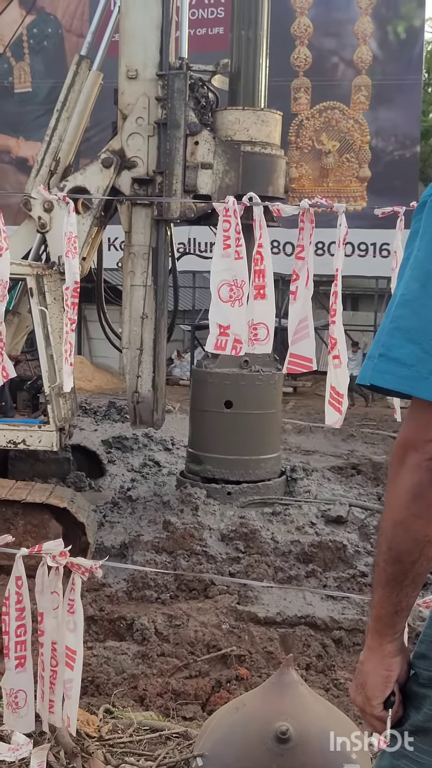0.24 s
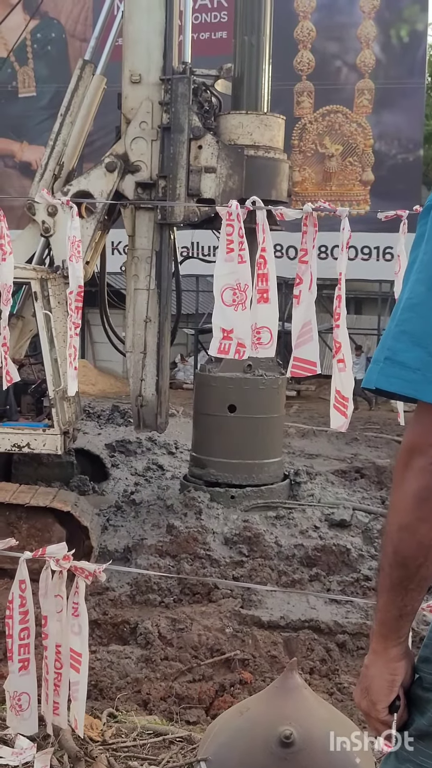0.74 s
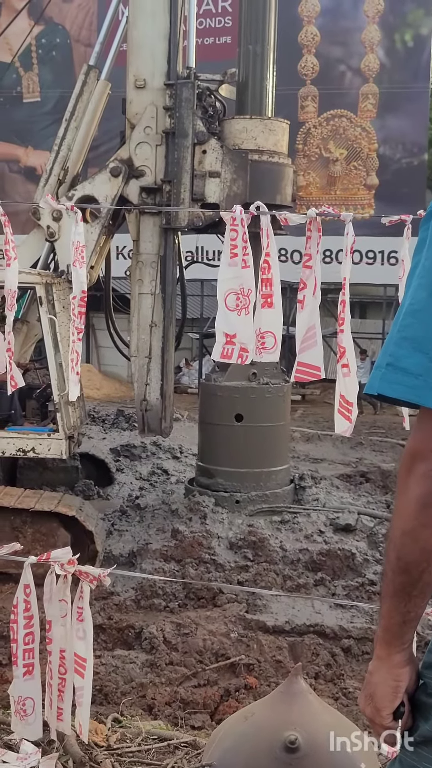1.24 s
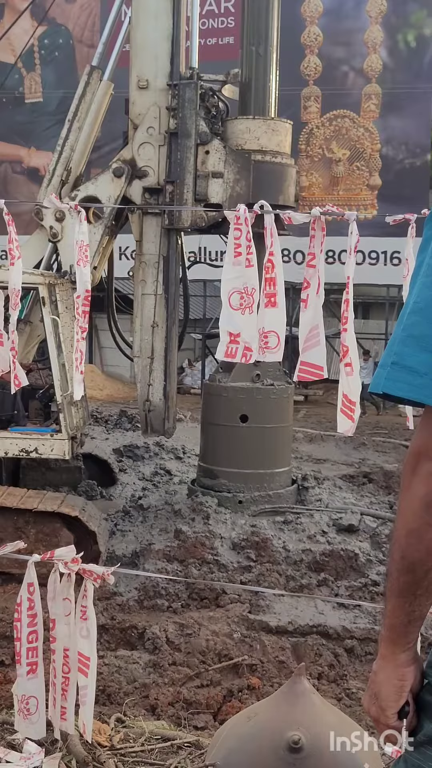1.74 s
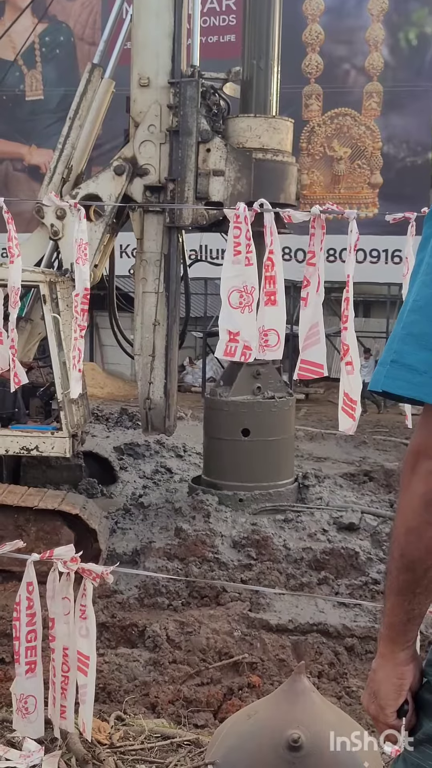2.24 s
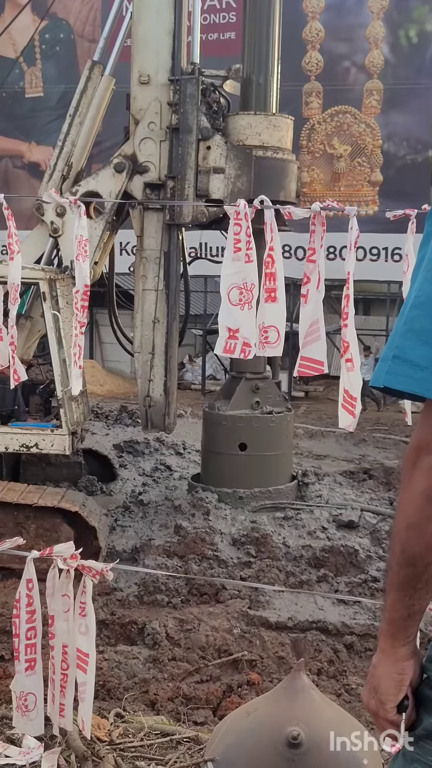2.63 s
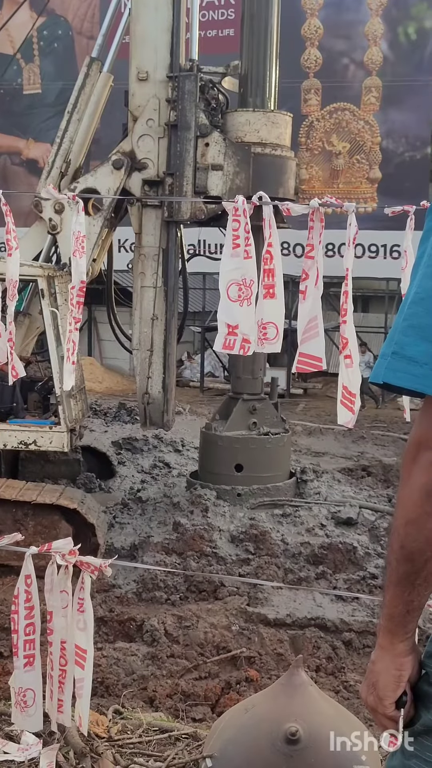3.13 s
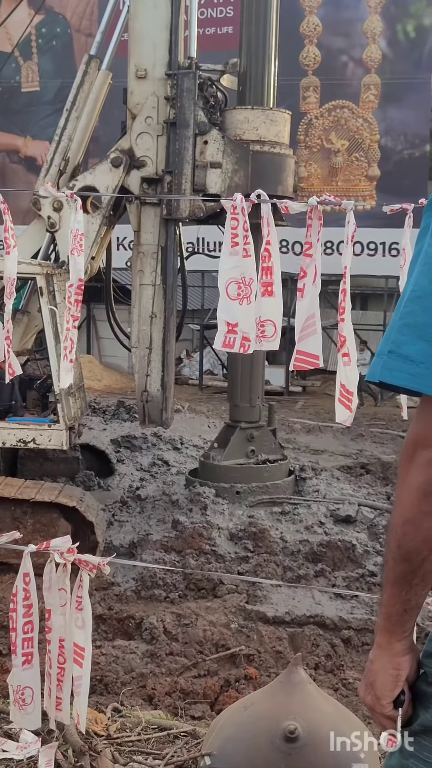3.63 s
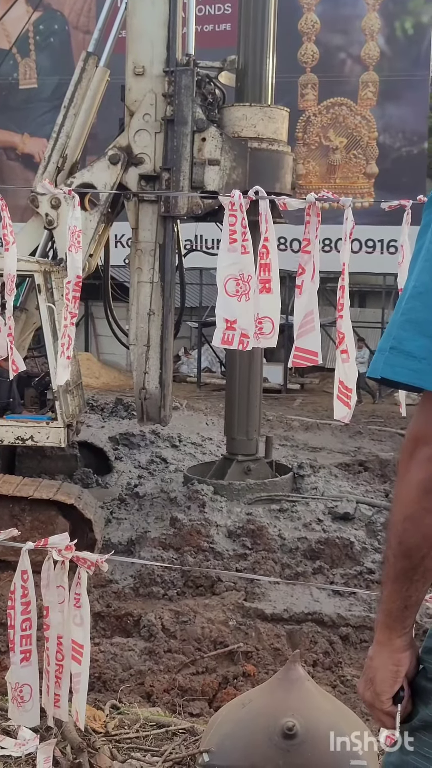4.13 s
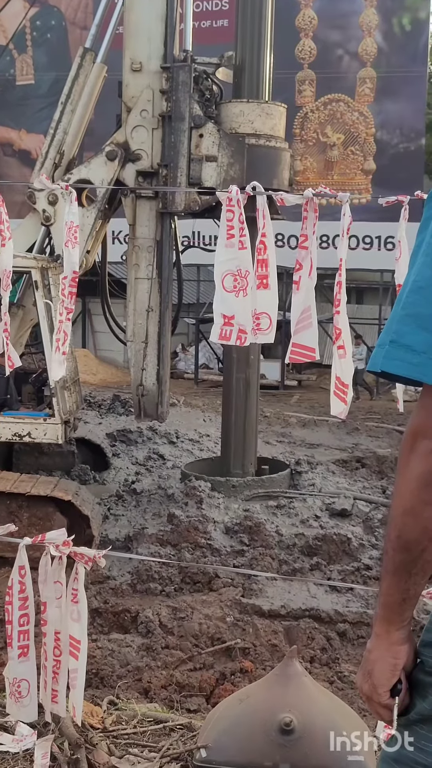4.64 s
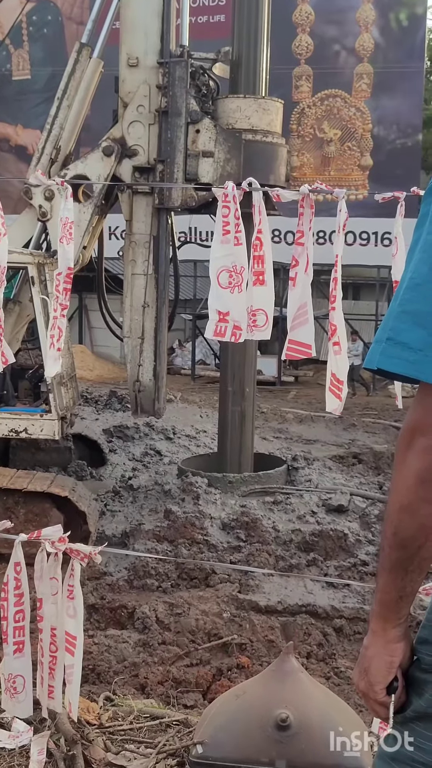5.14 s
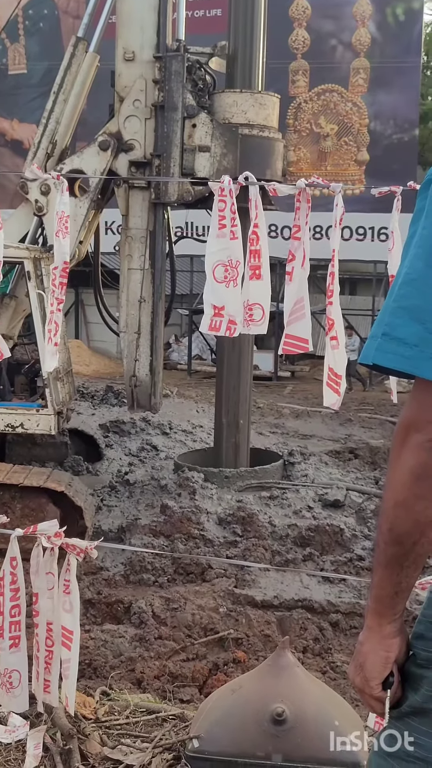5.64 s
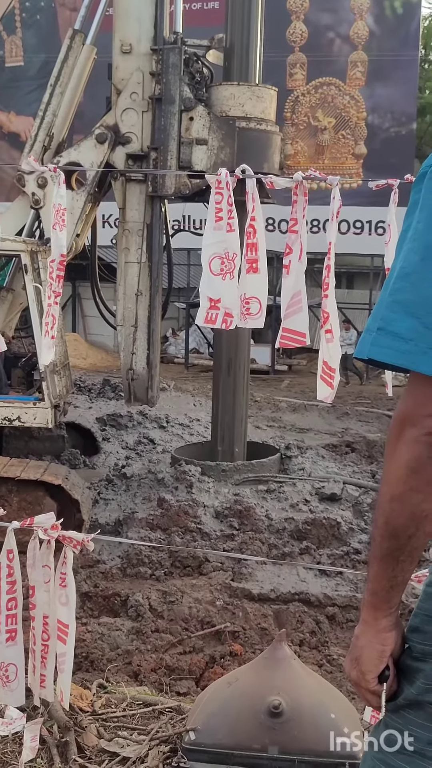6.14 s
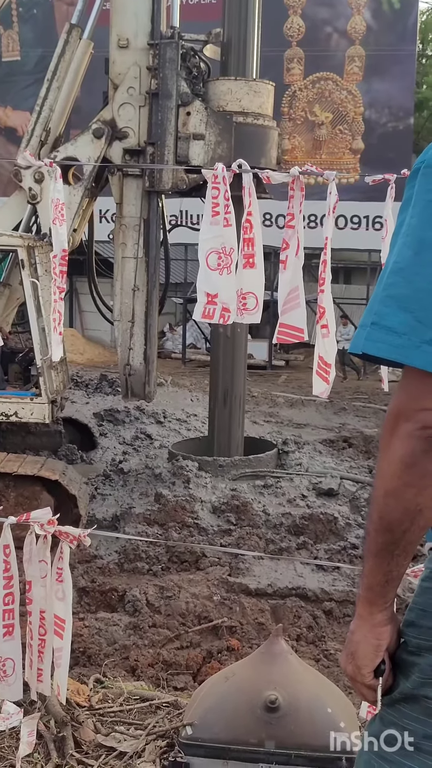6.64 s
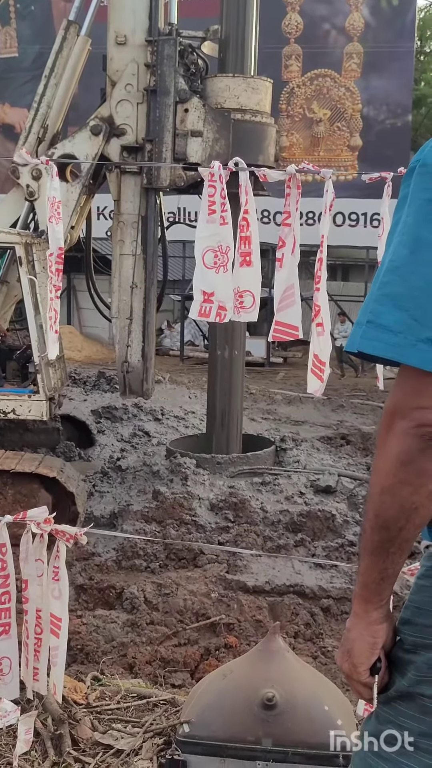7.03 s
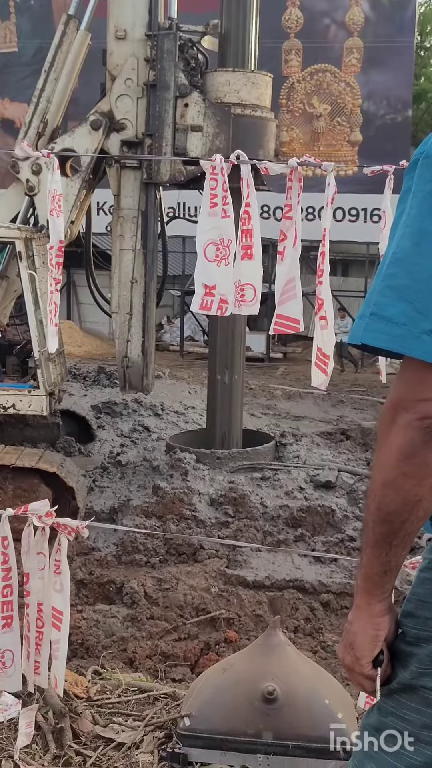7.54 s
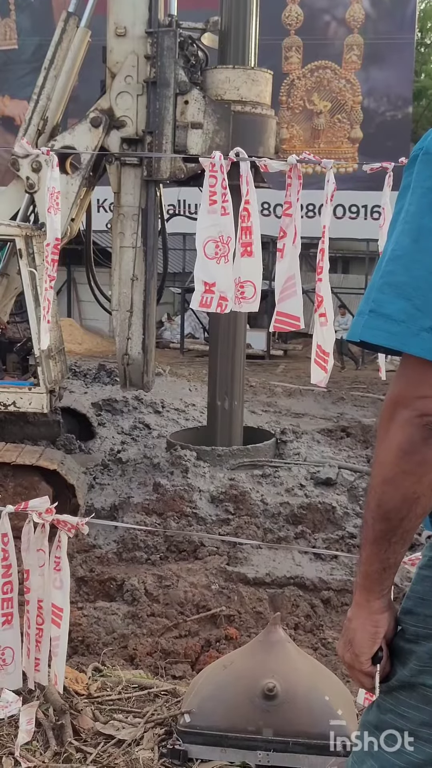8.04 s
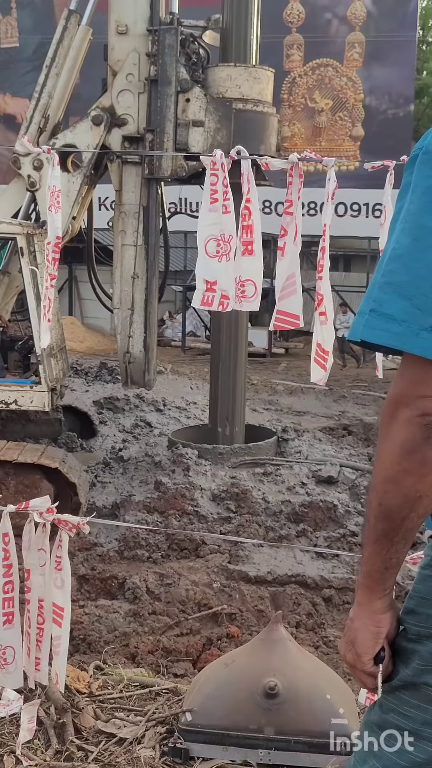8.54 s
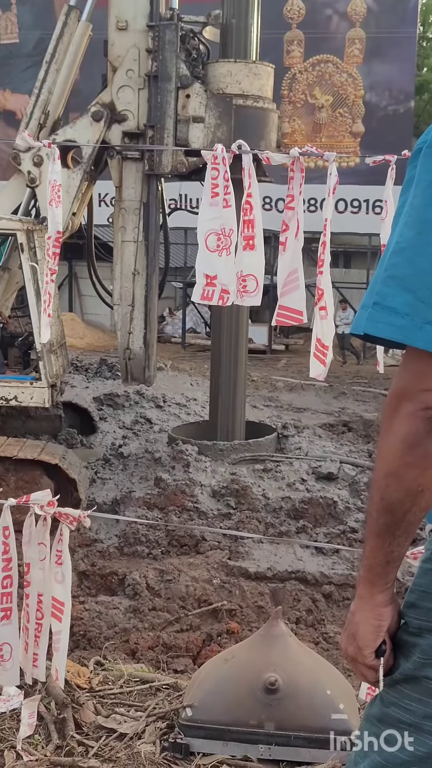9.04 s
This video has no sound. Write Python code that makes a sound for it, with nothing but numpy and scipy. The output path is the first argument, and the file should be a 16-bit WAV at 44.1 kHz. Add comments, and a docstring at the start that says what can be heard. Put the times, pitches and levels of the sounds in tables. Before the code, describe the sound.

Throughout about 9.3 seconds a heavy six-cylinder diesel runs steadily a few metres away outdoors, its low firing hum near 90 Hz sagging very slightly at the start. A hydraulic pump hum near 270 Hz wavers above it, over boomy rumble, midrange roar and airy hiss. Small loose metal parts jingle right at 0 s, lightly at 0.3-0.7, in a busier cluster at 1.2-1.6, and most sharply around 2.3; a few faint ticks follow at 3.4-3.6 and 4.5-4.8. Roar and hiss swell near 3.75 as the bucket sinks into the casing. Short hollow steel knocks with low thumps come at 3.8-3.9, thickly at 4.5-4.85, and once at 5.2. Then the engine drones on with deeper, uneven boom, hiss rising briefly near 8.3, and a single knock at 9.0. Phone stereo: bass centred, treble wider, little deep bass, a slight rapid flutter.

```python
"""Diesel drilling rig outdoors

A six-cylinder diesel and its hydraulic pump run a few metres away: wandering sines at shaft orders
over four coloured noises (boom, rumble, roar, hiss).
In the first half small loose metal parts jingle: bursts of tiny impacts exciting resonances.
Later the drill bucket knocks on the steel casing: shaped bursts ring the casing's modes.
Two microphone ports of a phone pick up everything, alike in the bass and less so in the treble."""
import sys
import numpy as np
from scipy import signal
from scipy.fft import rfft, irfft
from scipy.io import wavfile
from scipy.ndimage import uniform_filter1d

SR = 44100
rng = np.random.default_rng(int(sys.argv[2]) if len(sys.argv) > 2 else 0)


def how_loud(loudness_db):
    """Turn decibels into a plain amplitude multiplier (0 dB gives 1, 20 dB gives 10)."""
    steps = np.asarray(loudness_db, float) / 20
    return 10 ** steps


def log_audio(samples):
    """Write samples as a 16-bit WAV file to the path given in sys.argv[1]."""
    # one column per channel
    frames = np.atleast_2d(samples).T
    # limit to full scale, then quantise
    limited = np.clip(frames, -1, 1)
    pcm = np.round(limited * 32767).astype(np.int16)
    wavfile.write(sys.argv[1], SR, pcm)


N = 409688
TIME = np.arange(N) / SR

# governed engine speed, sagging a little under load: (time [s], firing rate [Hz])
ENGINE_SPEED = [(0, 93.5), (.6, 92.3), (1.2, 90.9), (2, 90.83), (4, 90.44), (6, 90.45), (8, 90.06),
                (9.3, 90)]
# engine load: (time [s], swell of roar [dB], hiss level [dB])
ENGINE_LOAD = [(0, 1, -49), (.2, 0, -52.5), (.8, -0.5, -53.5), (1.4, 1, -51), (1.7, 0.6, -53.5),
               (3.0, 0, -53), (3.75, 1, -46), (4.27, -0.5, -50), (4.71, 0.5, -50), (5.41, -1, -53),
               (6.4, 0, -49.5), (8.1, -0.1, -51.5), (8.33, 1, -47.5), (8.61, 0, -49.5), (9.29, -0.5, -52)]
# slow level of the two hums: (time [s], firing tone level [dB], pump tone level [dB])
HUM_LEVELS = [(0, -25, -23), (.4, -29.5, -23), (.95, -21.5, -25), (1.3, -24.5, -21), (1.75, -24.5, -26),
              (2.2, -23, -23), (2.8, -23.5, -21), (3.1, -23.5, -25), (3.5, -25, -23.5), (4.2, -25, -23),
              (4.8, -24, -23.5), (5.4, -25.5, -25.5), (5.9, -26, -20), (6.3, -24.5, -22.5),
              (7.2, -25, -20.5), (7.7, -24.5, -24.5), (8.4, -24.5, -23.5), (9.29, -23, -23.5)]


def evened(x):
    """Scales to an rms of one."""
    return x / np.sqrt(np.mean(abs(x) ** 2) + 1e-20)


def read(points, hz, column=1):
    """Interpolates a table column over log frequency."""
    table = np.transpose(points)
    return np.interp(np.log(hz + 1), np.log(table[0] + 1), table[column])


def curve(rows, column):
    """Interpolates a table column over time."""
    table = np.transpose(rows)
    return np.interp(TIME, table[0], table[column])


def drift(rate_hz):
    """Slow random signal of rms one: white noise through two equal one-pole low-passes."""
    r = np.exp(-2 * np.pi * rate_hz / SR)
    return evened(signal.lfilter([1], [1, -2 * r, r * r], rng.standard_normal(N)))


def waver(db, hz):
    """Gain that wanders at random by an rms in dB, with mean power one."""
    return evened(how_loud(db * drift(hz)))


def resonate(x, hz, width_hz):
    """One damped mode: a complex one-pole of unit peak gain."""
    r = np.exp(-np.pi * width_hz / SR)
    pole = r * np.exp(2j * np.pi * hz / SR)
    return 2 * signal.lfilter([1 - r], [1, -pole], x).real


def ring(x, hz, width_hz):
    """Steep resonance of rms one: two modes at one frequency, the second twice as wide."""
    return evened(resonate(resonate(x, hz, width_hz), hz, 2 * width_hz))


def contact(length_s, rise_s):
    """Two unrelated bursts of tiny impacts that swell and die under one envelope."""
    t = np.arange(7000) / SR
    swell = 1 - np.exp(-(t / rise_s) ** 2)
    decay = np.exp(-(t / max(length_s, .003)) ** 2)
    clumps = how_loud(1.1 * evened(uniform_filter1d(rng.standard_normal(len(t)), 90)))  # impacts come in bunches
    return swell * decay * clumps * rng.standard_normal((2, len(t)))


def add(mix, start_s, sound, peak_db):
    """Adds a pair of sounds at a time, scaled by the peak of the first."""
    part = mix[:, round(start_s * SR):][:, :sound.shape[1]]
    part += how_loud(peak_db) * sound[:, :part.shape[1]] / abs(sound[0]).max()


def noise(spectrum, patchy_db, flicker_db):
    """Two unrelated noises of one colour, with shared drifting patches and a shared flicker."""
    frames, hz = N // 256 + 5, np.fft.rfftfreq(2048, 1 / SR)
    z = rng.standard_normal((2, frames // 2, 1025, 2)) @ [1, 1j]
    patches = uniform_filter1d(rng.standard_normal(z.shape[1:]), 8, 0)  # over time
    patches = evened(uniform_filter1d(patches, 20, 1))  # over frequency
    z *= how_loud(read(spectrum, hz) + patchy_db * patches)
    pair = evened(signal.istft(z.transpose(0, 2, 1), nperseg=2048, noverlap=1536)[1][:, :N])
    return pair * how_loud(flicker_db * drift(22))


def jingles():
    """Each rattle rings a struck piece and others, fainter the further off in pitch, over a broad tick."""
    # rattles: (start [s], peak level [dB], ring of piece struck hardest [Hz], length [s], tick level [dB])
    rattles = [(0, -24, 4440, 0.085, 3), (.004, -18, 6020, 0.029, -6), (.03, -20, 6040, 0.028, -12),
               (0.307, -24.5, 3200, .08, -18), (.308, -30, 2800, .06, -18), (0.329, -39, 14100, .075, -6),
               (.397, -35, 2820, .03, -4), (.714, -32, 9700, .008, 7), (1.207, -26, 4180, 0.088, -12),
               (1.239, -16, 4820, 0.023, 9), (1.255, -31, 4440, 0.11, 4), (1.287, -25.5, 2890, 0.04, 0),
               (1.322, -24, 4600, .016, 4), (1.443, -29, 6050, 0.017, -15), (1.449, -25, 5200, .012, -8),
               (1.484, -31, 6750, .03, -14), (1.486, -20.5, 4850, 0.023, -1),
               (1.506, -29.5, 3950, 0.055, 4), (1.533, -36, 6800, .012, -14),
               (1.602, -28.5, 5900, .022, -15), (1.916, -31, 2900, .022, -12),
               (2.019, -26.5, 5330, .013, -10), (2.052, -28.5, 3870, 0.038, -12),
               (2.193, -34, 6070, .011, -11), (2.203, -27, 2600, .025, -17), (2.213, -24, 4390, .02, -14),
               (2.235, -25, 4680, 0.018, -6), (2.253, -29, 6040, 0.017, -2), (2.282, -12.5, 4670, .025, 7),
               (2.284, -22, 7140, 0.013, -16), (2.288, -21, 2200, .02, -13), (2.301, -21, 3930, 0.019, -3),
               (2.325, -24, 4650, 0.014, 7), (2.341, -31, 3900, .041, 6), (3.42, -30, 4750, .01, -7),
               (3.481, -25.5, 3830, 0.014, -2.5), (3.559, -38, 7750, .009, 0),
               (4.475, -27, 3240, 0.018, -6), (4.514, -37, 3970, .011, -3), (4.809, -29, 3000, 0.012, 0)]
    # modes of the loose parts: (frequency [Hz], a fifth of the width [Hz], level if struck [dB])
    loose_parts = [(2200, 120, 15), (2600, 135, 21), (3260, 53, 1.5), (3520, 44, -43), (3950, 48, 14),
                   (4340, 87, 13), (4760, 110, 5), (5410, 38, 5.5), (6080, 47, -11), (6770, 42, 3),
                   (7500, 36, -7), (10650, 110, -2), (11370, 35, -1), (13200, 58, -22)]
    mix = np.zeros((2, N))
    for start_s, peak_db, struck_hz, length_s, tick_db in rattles:
        hits = contact(length_s, rise_s=0.0035 + 0.23 * min(length_s, .022))
        others = 0
        for hz, fifth_hz, db in loose_parts:
            octaves = abs(np.log2(hz / struck_hz))
            others = others + how_loud(db - 6.0 * octaves) * ring(hits, hz, 5 * fifth_hz)
        struck = ring(hits, struck_hz, 0.025 * struck_hz)
        tick = ring(hits, 4340, 3400) + 0.35 * evened(resonate(hits, 5600, 7600))
        tick = how_loud(tick_db) * evened(tick + 0.83 * ring(hits, 1400, 900))
        add(mix, start_s, how_loud(3.5) * evened(others) + .9 * struck + tick, peak_db)
    return mix


def knocks():
    """A scraping blow of the bucket rings the casing; its two lowest modes are the thump."""
    # blows: (start [s], peak level of ring [dB], thump peak re ring [dB], contact length [s])
    blows = [(3.794, -22, -7, .01), (3.827, -34, 23.5, 0.059), (3.891, -15.5, -8, 0.006),
             (4.49, -27, -10, .12), (4.545, -20.5, -10, 0.012), (4.6, -16, 9.5, 0.015),
             (4.643, -28.5, 18.5, .012), (4.67, -19, 7, 0.011), (4.698, -36, 14, 0.013),
             (4.81, -17, 4, 0.018), (4.834, -16, 12, 0.0078), (5.235, -23, -4, 0.0082),
             (9.007, -21, -3, 0.0091)]
    # casing modes, the two of the thump first: (frequency [Hz], width [Hz], level within its group [dB])
    casing_modes = [(93.6, 27, 0), (285, 61, -4), (955, 55, 7), (1056, 69, 10), (1540, 180, 6),
                    (1590, 210, -2), (2090, 290, 2), (3000, 1500, -8), (590, 110, 4)]
    mix = np.zeros((2, N))
    for start_s, peak_db, thump_db, length_s in blows:
        hits = contact(length_s, rise_s=0.0016)
        clang = sum(how_loud(db) * ring(hits, hz, width_hz) for hz, width_hz, db in casing_modes[2:])
        thump = sum(how_loud(db) * ring(hits, hz, width_hz) for hz, width_hz, db in casing_modes[:2])
        add(mix, start_s, clang, peak_db)
        add(mix, start_s, thump, peak_db + thump_db)
    return mix


def hiss():
    """Cooling air and oil flow: treble noise whose level moves with the load."""
    # (frequency [Hz], relative density [dB per Hz])
    hiss_colour = [(1940, -28), (3300, -6.5), (3680, -9), (4010, -6), (4680, -3), (6990, -11), (7760, -8),
                   (8490, -18), (12400, -10.5), (15500, -21)]
    return how_loud(curve(ENGINE_LOAD, column=2)) * noise(hiss_colour, patchy_db=0.5, flicker_db=1.13)


def boom():
    """Low engine noise; it grows once the bucket slides down the casing."""
    # (frequency [Hz], relative density [dB per Hz])
    boom_colour = [(15, -34), (30, -8), (50, 1), (75, -3.5), (110, 0), (150, 0), (195, -10), (260, -28),
                   (500, -90)]
    # (time [s], level [dB])
    boom_levels = [(0, -28.5), (.3, -34), (1, -31), (2, -25), (3, -32), (4.2, -24.5), (4.9, -25),
                   (5.3, -27), (6.1, -23), (6.5, -26.5), (7.2, -21), (7.6, -23.5), (8.2, -23.5),
                   (9.29, -26.5)]
    gain = how_loud(curve(boom_levels, column=1)) * waver(db=2.4, hz=4.9)
    return gain * noise(boom_colour, patchy_db=0.35, flicker_db=-0.1)


def rumble():
    """Engine body: low-mid noise that follows most of the roar's swell."""
    # (frequency [Hz], relative density [dB per Hz])
    body_colour = [(15, -40), (40, -11.5), (130, -10), (200, -5), (265, 2), (310, -1.5), (340, -3.5),
                   (445, -8), (480, -18.5), (600, -19), (780, -49), (1300, -120)]
    gain = how_loud(-23.5 + 0.91 * curve(ENGINE_LOAD, column=1))
    return gain * noise(body_colour, patchy_db=0.14, flicker_db=0.36)


def roar():
    """Engine block and covers: midrange noise that swells with load; each firing puffs it a little."""
    # (frequency [Hz], relative density [dB per Hz])
    block_colour = [(280, -37), (480, -6), (568, 0), (615, -8), (655, -1.5), (782, -7), (1050, -0.5),
                    (1250, -6), (1530, -5.5), (1830, -8.5), (1900, -13.5), (2460, -15.5), (3470, -20.5),
                    (4000, -27.5), (5200, -32.5), (8800, -120)]
    firing = np.cos(2 * np.pi * np.cumsum(curve(ENGINE_SPEED, column=1)) / SR)
    gain = how_loud(-31.5 + curve(ENGINE_LOAD, column=1)) * (1 + 0.021 * firing)
    return gain * noise(block_colour, patchy_db=0.82, flicker_db=0.72)


def tone(multiple, width_hz, clean):
    """Shaft order: a sine wandering in phase, with a fuzzy skirt from uneven strokes."""
    turns = multiple * np.cumsum(curve(ENGINE_SPEED, column=1)) / SR
    wander = np.cumsum(rng.standard_normal(N)) * np.sqrt(2 * np.pi * width_hz / SR)
    fuzz = (drift(2 * width_hz) + 1j * drift(2 * width_hz)) / np.sqrt(2)
    size = clean * np.exp(1j * wander) + (1 - clean) * fuzz
    return evened((size * np.exp(2j * np.pi * turns)).real)


def faint_orders():
    """Fainter tones at fixed multiples of the firing rate."""
    # (multiple of firing rate [1], level [dB], width [Hz])
    order_rows = [(.667, -33, 6.56), (1.667, -36, 5.23), (2.01, -41, 4.6), (2.5, -33, 6.5),
                  (3.333, -30.5, 6.1), (5.01, -39, 4.02), (11.5, -43.5, 30.45), (16.7, -48, 7.93),
                  (19.65, -48, 6.05)]
    return sum(how_loud(db) * tone(k, width_hz, clean=0.58) for k, db, width_hz in order_rows)


def pump_tone():
    """Nine-piston hydraulic pump: a wavering hum at three times the firing rate."""
    gain = how_loud(curve(HUM_LEVELS, column=2)) * waver(db=3.36, hz=4.16)
    return gain * tone(3, width_hz=4.09, clean=0.95)


def firing_tone():
    """Six-cylinder diesel: a hum at the firing rate, three per turn of the shaft."""
    gain = how_loud(curve(HUM_LEVELS, column=1)) * waver(db=.8, hz=3.2)
    return gain * tone(1, width_hz=2.13, clean=0.99)


def ports(x, unlike):
    """Two ports: the right one gets part of the same sound, turned in phase, and part of another."""
    # (frequency [Hz], likeness [0-1], lead of left [rad], left minus right [dB])
    port_points = [(30, .995, .35, -3), (70, .997, .15, -1.3), (170, .995, .08, -1.7),
                   (270, .99, -.1, -3.4), (380, .97, -.1, -3.5), (500, .88, .35, -2), (640, .78, .5, -2.2),
                   (760, .4, .8, 2), (900, .65, -1.1, 4.5), (1100, .87, -.8, -1.5), (1500, .86, -.2, -3),
                   (1880, .6, .8, -6.5), (2250, .55, 1.6, 5), (2600, .35, 3.8, -2.5), (3100, .45, 4.5, -4),
                   (4200, .18, 4.4, -2), (8700, .3, 3.3, -3), (12000, .15, 3.1, -5), (15500, .1, 3.1, -1.5)]
    hz = np.fft.rfftfreq(N, 1 / SR)
    same = np.clip(read(port_points, hz, column=1), 0, 1)
    turn = np.exp(-1j * read(port_points, hz, column=2))
    lean = how_loud(read(port_points, hz, column=3) / 2)  # half of the difference to each side
    left = rfft(x)
    right = same * left * turn + np.sqrt(1 - same ** 2) * rfft(unlike)
    return irfft([left * lean, right / lean], N)


def scene():
    """All sources as heard at the two ports; the jingling leans to the right."""
    near, far = jingles()
    hums = faint_orders() + pump_tone() + firing_tone()
    hum_pair = np.array([hums, hums[::-1]])  # time-reversed hums serve as the unlike sound
    rig = ports(*(hiss() + boom() + rumble() + roar() + knocks() + hum_pair))
    own = 0.29 * np.roll(near, 27) + 0.97 * far  # a weak copy 27 samples late, mostly unrelated sound
    return rig + how_loud(np.array([[-1.1], [1.1]])) * ports(near, own)


def low_pass(x):
    """Removes everything above the highest recorded frequency."""
    return signal.sosfilt(signal.butter(12, 15700, fs=SR, output="sos"), x)


def record(dry):
    """Small microphones lose the deep bass; the whole level flutters evenly, 43 times a second."""
    thinned = signal.lfilter(*signal.butter(2, 32, "highpass", fs=SR), dry)
    flutter_hz = SR / 1024
    flutter = 1 + 0.13 * np.cos(2 * np.pi * (flutter_hz * TIME - .59))
    return low_pass(thinned * flutter)


dry = scene()
out = record(dry)
log_audio(out)
```